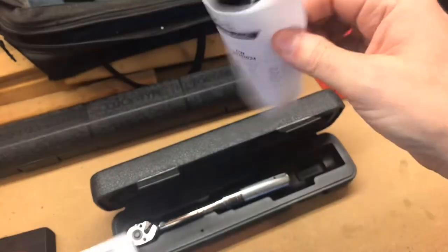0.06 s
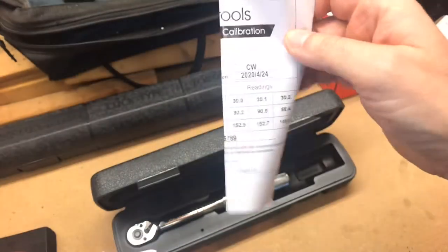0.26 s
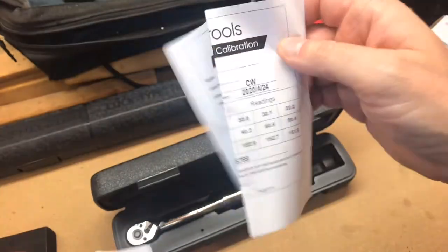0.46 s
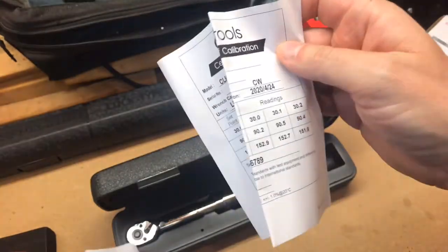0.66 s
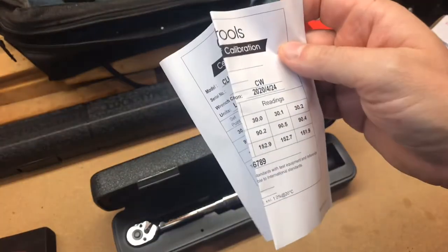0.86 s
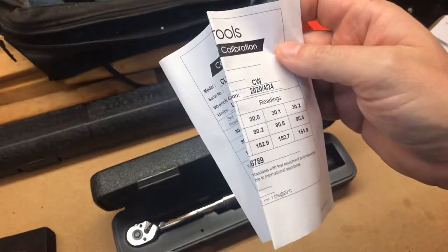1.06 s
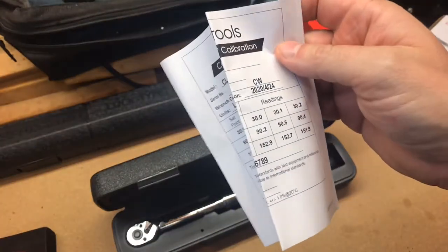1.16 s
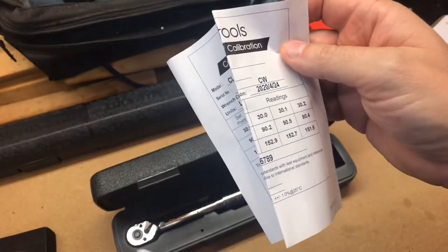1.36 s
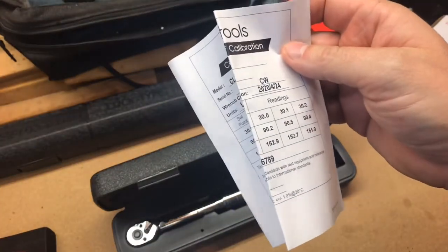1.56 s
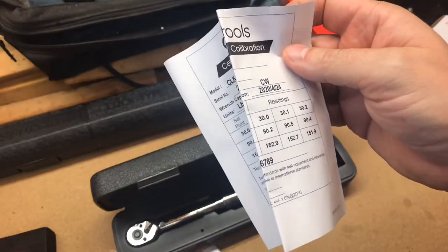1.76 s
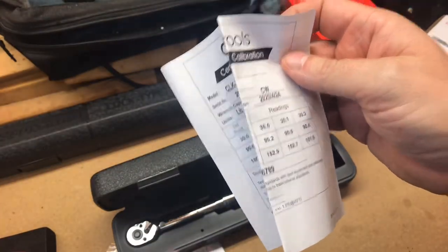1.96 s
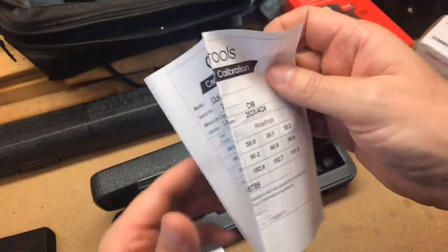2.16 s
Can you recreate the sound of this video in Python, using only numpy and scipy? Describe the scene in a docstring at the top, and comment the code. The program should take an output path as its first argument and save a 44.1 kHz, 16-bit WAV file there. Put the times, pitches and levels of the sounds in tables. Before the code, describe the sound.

Paper crackles and slides as a hand unfolds it, ending with a soft bump.

```python
"""Folded paper sheets are shaken open in one hand, close to the microphone, over a workbench in a small room.
First creases snap and crumple, and the flapping sheets push low puffs of air at the microphone.
Then the sheets slide over each other, with more snaps and, late on, two faint squeaks.
At the end a soft bump on the bench comes with a last rustle. The room rumbles quietly throughout."""
import sys
import numpy as np
from scipy import signal
from scipy.fft import rfft, irfft
from scipy.io import wavfile
from scipy.ndimage import uniform_filter1d

SR = 44100
rng = np.random.default_rng(int(sys.argv[2]) if len(sys.argv) > 2 else 0)


def to_wav(sig):
    """Store sig (one row per channel, or 1-D mono) as 16-bit WAV at the path in sys.argv[1].

    Samples outside -1..1 are clipped; the rate is SR.
    """
    pcm = np.clip(np.atleast_2d(sig), -1, 1) * 32767
    pcm = np.round(pcm).astype(np.int16)
    wavfile.write(sys.argv[1], SR, pcm.T)  # frames by channels


N = 97020
T = np.arange(N) / SR

# the tone colour of snapping and crumpling paper: frequency_hz, level_db
PAPER_SPECTRUM = [(150, -2), (750, -1.5), (1300, 1), (3900, 0), (4900, -5), (5900, -3), (10400, -9.5),
                  (11700, -3.5), (15500, -17)]


def amp(db):
    """Turn decibels into a number to multiply by."""
    return 10 ** (np.asarray(db) / 20)


def unit(x):
    """Scale a signal to an average strength (rms) of 1."""
    return x / np.sqrt(np.mean(x ** 2))


def curve_db(points, hz):
    """Read a spectrum's level at the given frequencies."""
    f, db = np.array(points).T
    return np.interp(np.log(hz), np.log(f), db)


def shape(x, response):
    """Filter a sound; response gives the gain in dB for each frequency."""
    hz = np.maximum(np.fft.rfftfreq(len(x), 1 / SR), 1)
    return irfft(rfft(x) * amp(response(hz)), len(x))


def grains(size, per_s, spread_db):
    """Random tiny clicks, many weak and a few strong."""
    strength = amp(spread_db * np.minimum(rng.exponential(size=size), 6))
    return (rng.random(size) < per_s / SR) * strength * rng.choice([-1, 1], size)


def flutter(size, depth_db):
    """A gain that wobbles quickly and randomly, like an uneven motion."""
    wobble = shape(rng.standard_normal(size), lambda f: -20 * np.log10(1 + (f / 90) ** 2))
    return amp(depth_db * unit(wobble))


def steady(x, size):
    """Even out the chance swells of a noise."""
    return x / np.sqrt(uniform_filter1d(x ** 2, size))


def burst(envelope, response):
    """A short noise under a loudness curve, its spectrum evened out and then coloured."""
    spectrum = rfft(rng.standard_normal(len(envelope)) * envelope)
    even = irfft(spectrum / np.sqrt(uniform_filter1d(np.abs(spectrum) ** 2, 25)))
    return unit(shape(even, response)) * np.sqrt(np.mean(envelope ** 2))


def rumble():
    """Low room noise that swells and sinks a little, and a faint hum."""
    # the tone colour of the noise: frequency_hz, level_db
    spectrum = [(20, 1.5), (45, 8), (110, 0.5), (150, -5.5), (340, -7.5), (750, -19), (1300, -20),
                (3200, -31.5), (9000, -40.5), (16000, -46)]
    # its loudness over time: time_s, level_db
    levels = [(0, -39), (.2, -44.5), (.6, -48), (1.55, -46), (1.73, -42.5), (1.92, -46)]
    hum_hz, hum_db = 338, -68.5
    noise = unit(shape(rng.standard_normal(N), lambda f: curve_db(spectrum, f)))
    hum = amp(hum_db) * np.sqrt(2) * np.sin(2 * np.pi * hum_hz * T)
    return amp(np.interp(T, *np.array(levels).T)) * noise + hum


def room(x, size=16384):
    """Add short, slightly dull echoes from the bench and walls."""
    # the tone colour of the echoes: frequency_hz, level_db
    spectrum = [(100, 1), (3000, -1), (16000, -4)]
    echo_db, gap_s, fade_60db_s = -10, 0.0044, 0.26
    t = np.arange(size) / SR
    tail = shape(rng.standard_normal(size), lambda f: curve_db(spectrum, f))
    tail *= np.exp(-np.log(1000) * t / fade_60db_s) * (t > gap_s)
    return x + amp(echo_db) * signal.fftconvolve(x, tail / np.sqrt(np.sum(tail ** 2)))[:N]


def bench_bump():
    """A soft, scuffing knock that dies quickly in the wooden bench."""
    # how the wood answers a knock: frequency_hz, level_db
    spectrum = [(90, -17), (160, -4), (245, -0.5), (420, -10), (750, -19), (3000, -39)]
    start_s, level_db, rise_s, fade_60db_s = 2.101, -33.5, 0.0021, 0.15
    t = np.maximum(T - start_s, 0)
    wood = steady(shape(rng.standard_normal(N), lambda f: curve_db(spectrum, f)), size=661)
    return amp(level_db) * wood * (1 - np.exp(-t / rise_s)) * np.exp(-np.log(1000) * t / fade_60db_s)


def edge_squeaks():
    """As the sliding slows, the paper's edge sticks and slips in thin, wavering, sinking tones."""
    # squeaks of the edge: peak_s, half_length_s, pitch_hz, peak_db
    squeaks = [(1.82, 0.06, 4620, -65.5), (1.892, 0.12, 3260, -64)]
    sag_per_s, waver_depth = 0.45, 0.02  # both as fractions of the pitch
    out = np.zeros(N)
    for peak_s, half_s, pitch_hz, peak_db in squeaks:
        waver = unit(uniform_filter1d(rng.standard_normal(N), size=90))
        pitch = pitch_hz * np.exp(-sag_per_s * (T - peak_s)) * (1 + waver_depth * waver)
        swell = amp(peak_db) * np.exp(-((T - peak_s) / half_s) ** 2)
        out += swell * np.sin(2 * np.pi * np.cumsum(pitch) / SR)
    return out


def sliding_sheets():
    """Sheet rubs unevenly on sheet, and thousands of catching fibres blur into a hiss."""
    # loudness of the rubbing, below and above split_hz: time_s, body_db, treble_db
    levels = [(0, -52, -51), (.22, -61, -61.5), (.34, -55, -62.5), (.41, -64.5, -58.5), (.64, -60.5, -64),
              (.745, -54.5, -53.5), (.85, -63.5, -57.5), (.94, -52, -51.5), (1.06, -57, -52.5),
              (1.14, -59.5, -55), (1.27, -61, -59), (1.325, -52.5, -47.5), (1.40, -55, -54),
              (1.46, -64, -61.5), (1.50, -56.5, -55.5), (1.61, -52, -52.5), (1.75, -57.5, -56.5),
              (1.84, -67.5, -74), (2.07, -64, -79), (2.13, -46.5, -46.5), (2.2, -67, -79)]
    # its tone colour: frequency_hz, level_db
    spectrum = [(200, -9.5), (1300, -2.5), (2200, 1.5), (4200, -0.5), (4900, -3.5), (6300, -3), (7800, -8),
                (9600, -5.5), (10400, -9.5), (11600, -5), (15500, -5.5)]
    split_hz = 6300
    time_s, body_db, treble_db = np.array(levels).T
    rub = shape(grains(N, per_s=10000, spread_db=2), lambda f: curve_db(spectrum, f))
    lows = shape(rub, lambda f: -20 * np.log10(1 + (f / split_hz) ** 6))
    body = unit(lows) * amp(np.interp(T, time_s, body_db))
    treble = unit(rub - lows) * amp(np.interp(T, time_s, treble_db))
    return flutter(N, depth_db=2.37) * (body + treble)


def air_puffs():
    """Each flap shakes the sheet, then pushes a brief, low, sinking wave of air at the microphone."""
    # puffs from the flapping sheets: peak_s, peak_db, pitch_hz, half_length_ms
    puffs = [(0.253, -19.5, 53, 10.6), (.274, -21.5, 45, 22), (0.31, -20, 60.6, 9.6),
             (0.348, -21, 47.3, 22), (0.407, -14.5, 53.5, 11), (0.428, -20.5, 49.8, 32.3),
             (0.494, -9.5, 57, 6.2), (0.53, -22, 37, 37), (.708, -18.5, 64.4, 13.5), (0.763, -29, 43.8, 56),
             (1.818, -35.5, 41.4, 17)]
    sag_per_s = 23  # how fast the pitch falls, relative to itself
    flap_db, flap_hz, flap_lead_s = -37, 150, 0.011
    air, flap_swells = np.zeros(N), np.zeros(N)
    for peak_s, peak_db, pitch_hz, half_ms in puffs:
        half_s = half_ms / 1000
        t = np.arange(-4 * half_s, 4 * half_s, 1 / SR)
        cycles = pitch_hz * (1 - np.exp(-sag_per_s * t)) / sag_per_s
        swell = amp(peak_db) * np.exp(-(t / half_s) ** 2)
        add(air, peak_s + t[0], swell * np.cos(2 * np.pi * cycles))
        add(flap_swells, peak_s + t[0] - flap_lead_s, swell)
    flap = shape(rng.standard_normal(N), lambda f: -9 * np.log2(f / flap_hz) ** 2)
    return air + amp(flap_db) * flap_swells * steady(flap, size=882)


def crumpling_folds(size=8192):
    """A fold gives way by jerks, in a swelling and fading cloud of fibre clicks."""
    # folds giving way: peak_s, rise_ms, fall_ms, level_db, treble_tilt_db_per_octave
    folds = [(.050, 2.9, 5, -40.5, 1), (.118, 35, 18, -46.5, -1), (0.2665, 5.4, 3.3, -30, 2),
             (.288, 8.3, 30, -47, -0.5), (1.213, 4.4, 15, -41, -2), (1.219, 3.5, 5, -34, 22),
             (1.305, 5.1, 15, -45, -5), (1.994, 4.4, 24, -64, 4), (2.110, 15.5, 11, -37.5, -2)]
    out = np.zeros(N)
    t = (np.arange(size) - size // 2) / SR
    ms = t * 1000
    for peak_s, rise_ms, fall_ms, level_db, tilt in folds:
        clicks = grains(size, per_s=5300, spread_db=1.5)
        cloud = shape(clicks, lambda f: curve_db(PAPER_SPECTRUM, f) + tilt * np.log2(np.maximum(f, 1500)))
        cloud = unit(cloud * flutter(size, depth_db=0.5))
        swell = np.exp(np.minimum(ms / rise_ms, -ms / fall_ms))
        add(out, peak_s + t[0], amp(level_db) * cloud * swell)
    return out


def snapping_creases(size=2048):
    """A crease pops through: a sharp crack and the brief, partly pitched ring of the paper beside it."""
    # creases popping: start_s, level_db, pitch_hz, ring_decay_ms, crack_db (relative to the ring)
    snaps = [(0.0262, -35.5, 3950, 2, -23), (0.0421, -35.5, 3840, 3.5, 1), (0.085, -34, 1490, 1.0, -2),
             (0.097, -24.5, 2610, 3.3, -4.5), (0.0971, -28.5, 1410, 4.5, -25),
             (0.1104, -35, 2770, 4.5, -11), (0.2782, -31.5, 2370, 4.8, -3.5), (0.3077, -35.5, 1040, 3, -1),
             (0.3234, -30, 2040, 0.89, -25), (0.4765, -50.5, 4100, 3.1, 7), (.5010, -48.5, 3540, 2.4, 3),
             (.6640, -46, 546, 18, -19), (1.0034, -43.5, 2200, 2.8, 5.5), (1.1511, -35, 2510, 0.99, -0.5),
             (1.4834, -46.5, 2000, 11, -1), (1.5754, -37.5, 3000, 1.1, -9), (1.5810, -36, 2660, 1.1, -8),
             (1.6118, -42.5, 3420, 2.1, 4), (1.8135, -43, 1070, 2.5, -30), (2.0796, -43.5, 2650, 3.7, 0.5),
             (2.1380, -45, 2200, 1.5, 2), (2.1770, -36.5, 1640, 1.1, -15)]
    ring_width_octaves, tone_db = 0.81, -6
    out = np.zeros(N)
    t = (np.arange(size) - size // 10) / SR
    fade = lambda decay_s: (t >= 0) * np.exp(-np.abs(t) / decay_s)
    for start_s, level_db, pitch_hz, decay_ms, crack_db in snaps:
        ring_s = decay_ms / 1000
        crack_s = np.sqrt(0.0012 * ring_s)  # a longer ring has a longer crack
        near_pitch = lambda f: -20 * np.log10(1 + (np.log2(f / pitch_hz) / ring_width_octaves) ** 2)
        above_pitch = lambda f: 1.9 * np.log2(f) - 20 * np.log10(1 + (pitch_hz / f) ** 4)
        ring = burst(fade(ring_s), lambda f: curve_db(PAPER_SPECTRUM, f) + near_pitch(f))
        tone = fade(ring_s) * np.sin(2 * np.pi * pitch_hz * t)
        crack = burst(fade(crack_s), lambda f: curve_db(PAPER_SPECTRUM, f) + above_pitch(f))
        add(out, start_s + t[0], amp(level_db) * (ring + amp(tone_db) * tone + amp(crack_db) * crack))
    return out


def scene():
    """Paper and bench echo in the room; the puffs and the rumble are added without echo."""
    paper = snapping_creases() + crumpling_folds() + sliding_sheets() + edge_squeaks()
    return (room(paper + bench_bump()) + air_puffs() + rumble())[None]


def record(dry):
    """Drop the deepest bass and cut the highest treble."""
    bottom_hz, top_hz = 16, 15800
    trimmed = signal.sosfiltfilt(signal.butter(2, bottom_hz, "high", fs=SR, output="sos"), dry)
    return signal.sosfilt(signal.ellip(10, .2, 70, top_hz, fs=SR, output="sos"), trimmed)


def add(out, start_s, x):
    """Mix a short sound in at the given time."""
    i = int(round(start_s * SR))
    lo, hi = max(i, 0), min(i + len(x), N)
    out[lo:hi] += x[lo - i:hi - i]


dry = scene()
out = record(dry)
to_wav(out)
```